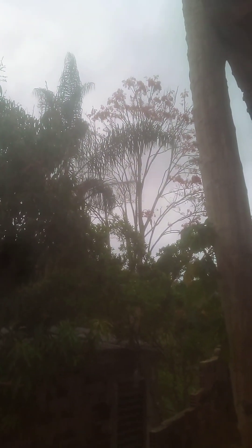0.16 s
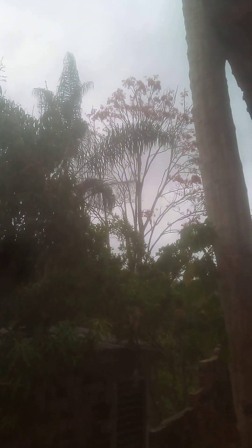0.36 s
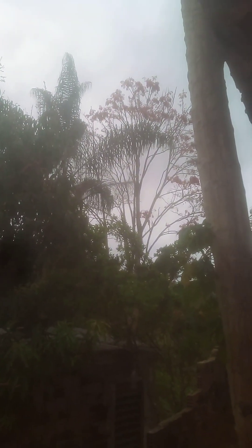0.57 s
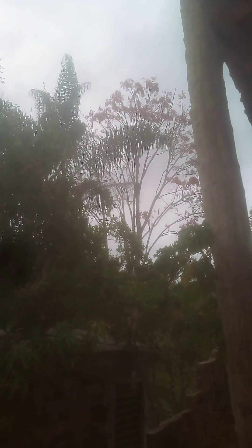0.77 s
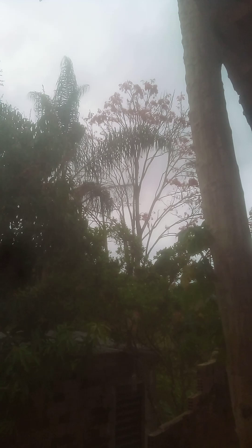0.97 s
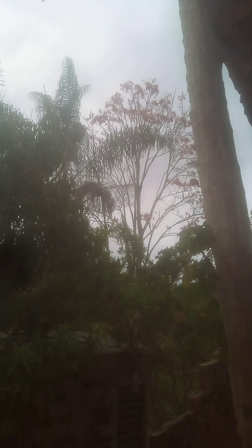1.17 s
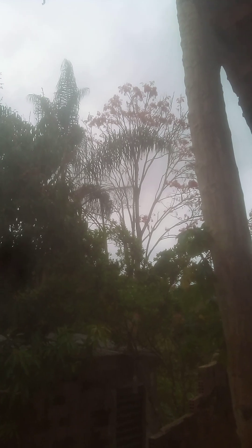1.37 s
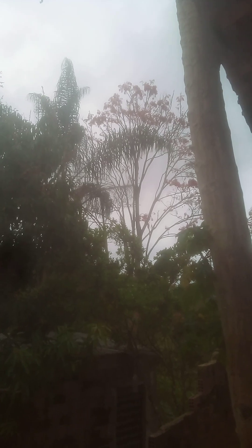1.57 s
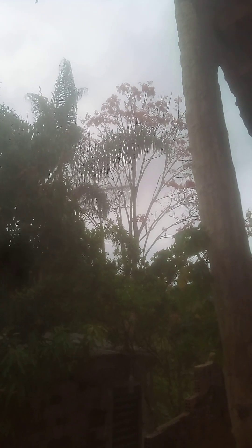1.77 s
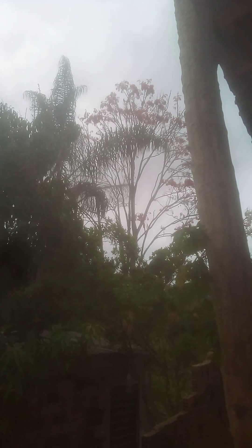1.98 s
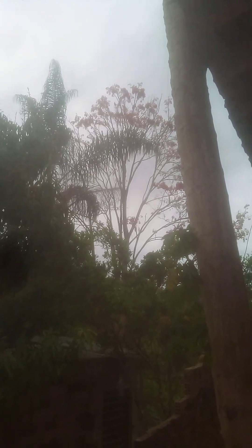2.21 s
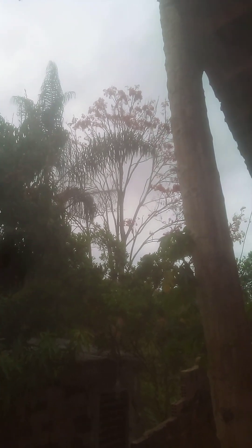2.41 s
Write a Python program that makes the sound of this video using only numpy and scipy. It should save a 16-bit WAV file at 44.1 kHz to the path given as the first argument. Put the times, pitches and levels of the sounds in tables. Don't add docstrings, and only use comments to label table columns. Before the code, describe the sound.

Outdoors in a leafy garden, one close bright parrot squawk comes early, then a cluster of distant raspy squawks, small twig ticks and late low fowl hoots, above a quiet hissing insect background.

```python
import sys
import numpy as np
from scipy import signal
from scipy.fft import rfft, irfft
from scipy.io import wavfile
from scipy.ndimage import uniform_filter1d

SR = 44100
rng = np.random.default_rng(int(sys.argv[2]) if len(sys.argv) > 2 else 0)


def put_to_file(sound):
    columns = np.atleast_2d(sound).T
    safe = np.clip(columns, -1, 1)
    whole_steps = np.round(safe * 32767)
    wavfile.write(sys.argv[1], SR, whole_steps.astype(np.int16))


def makeup_ratio(level_db):
    decades = np.asarray(level_db, float) / 20
    return 10 ** decades


N = 108045
T = np.arange(N) / SR
TOP_HZ = 15750

# f/Hz, density/dB per Hz
AIR_SPECTRUM = [(30, -19), (55, -2), (200, -8), (800, -9), (1400, -16.5), (2600, -9), (6000, -28.5),
                (15500, -27)]
# t/s, length/s, low f/Hz, high f/Hz, level/dB
TRAFFIC_SWELLS = [
    (0.158, 0.32, 88, 1110, -68.5),
    (1.092, 0.84, 296, 562, -68.5),
    (1.268, 0.36, 680, 1670, -68.5),
    (1.846, 0.34, 320, 664, -68),
    (2.237, 0.077, 320, 417, -66.5),
]
# f/Hz, density/dB
CICADA_SPECTRUM = [(2240, -48), (3800, -11), (4170, -9.5), (4400, -1), (4750, -1), (5150, -10), (5500, -20),
                   (6000, -25)]
# first t/s, last t/s, f/Hz, pulse rate/Hz, level/dB
CRICKET_TRAINS = [
    (0.611, 1.3, 8720, 32, -70.5),
    (2.03, 2.45, 8800, 30, -72),
    (1.343, 1.42, 9900, 23, -77),
    (1.498, 1.58, 9950, 13, -72),
    (1.676, 1.75, 9950, 23, -75),
    (1.857, 1.93, 9950, 23, -81.5),
    (2.025, 2.1, 9800, 23, -73),
    (2.195, 2.27, 9950, 23, -72),
    (2.37, 2.44, 10100, 23, -79),
]
# t/s, peak level/dB, lower ring level/dB, lower ring f/Hz
TWIG_SNAPS = [(0.521, -48, -13, 7030), (0.548, -37.5, -16, 7160), (0.602, -45, 0.5, 7560),
              (0.998, -52.5, -6.5, 7600), (1.1154, -41, -16, 7370), (1.254, -61, 4, 7600),
              (1.5028, -56, -13, 7500), (1.9462, -48, -11, 7270), (2.0353, -60, 3, 7260),
              (2.0375, -60, 15, 3620), (1.2545, -64, 11, 3930)]
# t/s, length/s, start f/Hz, end f/Hz, level/dB
WHISTLES = [
    (.115, 0.19, 7920, 7980, -73.5),
    (.93, 0.13, 7580, 7590, -70.5),
    (1.614, 0.071, 9750, 6500, -71),
    (2.238, .016, 6100, 7900, -80),
    (2.345, 0.016, 6200, 7500, -79.5),
    (2.436, .014, 7400, 7100, -79),
]
# t/s, length/s, start f/Hz, end f/Hz, level/dB
HOOTS = [(.9, 0.13, 869, 830, -71.5), (1.04, 0.12, 841, 837, -76), (1.14, 0.465, 430, 432.2, -66.5),
         (1.61, 0.28, 418, 412.4, -65), (1.33, 0.078, 885, 890, -64.5), (1.34, 0.096, 1744, 1790, -69),
         (1.985, 0.101, 899, 851, -57), (2.068, 0.038, 820, 814, -58.5), (2.336, 0.022, 830, 1090, -59.5),
         (2.352, 0.021, 1080, 980, -61.5), (2.366, 0.03, 970, 803, -55.5)]
# t/s, length/s, top f/Hz, level/dB, beak resonance level/dB
FAR_SQUAWKS = [(-.1, 0.17, 758, -59.5, 6), (0.574, 0.095, 769, -52, 5.5), (0.63, 0.14, 498, -57.5, 3.5),
               (0.695, 0.083, 796, -57.5, 6), (0.757, 0.087, 743, -51, 11.5), (1.002, 0.077, 766, -51.5, 6),
               (1.032, .08, 773, -52.5, 5.5), (1.032, 0.2, 494.7, -58, 5), (1.121, 0.1, 775, -55.5, 6.5),
               (1.22, 0.13, 695, -60.5, 2.5), (1.301, 0.14, 575, -62, 12.5), (1.5, .13, 521.6, -71.5, 16),
               (2.171, 0.129, 625, -71, 14), (0.836, 0.11, 707, -61, 6.5), (1.37, 0.126, 661, -64, 7)]
# f/Hz, level/dB
FAR_THROAT = [(700, -28), (1400, -21.5), (2000, -5.5), (3500, -3), (5500, -15.5), (7200, -14),
              (8000, -44.5), (9500, -48.5)]
# t/s, fundamental f/Hz, level/dB, odd overtone level/dB, fourth overtone ring level/dB
SQUAWK_CONTOUR = [
    (0.168, 466, -69.5, -6, -1),
    (0.177, 499, -45, -21, 5.5),
    (0.192, 568.3, -38, -24, 11),
    (0.203, 634, -37, 1, 6),
    (0.226, 721, -27, 2, 20),
    (0.305, 707.5, -23.5, -2.5, 21),
    (0.341, 681.7, -28.5, 5, 16.5),
    (0.356, 646.4, -35, 18, 24),
    (0.374, 464, -35.5, -20.5, 6.5),
]
# f/Hz, level/dB
NEAR_THROAT = [(700, -37), (1400, -22.5), (2200, -17), (3900, -19.5), (5000, -19.5), (6500, -21.5),
               (7900, -32.5), (10000, -57.5)]

DULL_DB_PER_DB = 0.26
MOUTH_PER_DULL, SECOND_PER_DULL, RAGGED_PER_DULL = 2.15, 0.61, 0.22
MOUTH_HZ, MOUTH_WIDTH_HZ, MOUTH_DB = 3150, 670, -2
TOP_RING_HZ, TOP_RING_WIDTH_HZ, TOP_RING_DB = 12600, 2900, 8


def level(x, db):
    return x * makeup_ratio(db) / np.sqrt(np.mean(x ** 2))


def shape(table, hz):
    table = np.array(table, float)
    return np.interp(np.log(np.maximum(hz, 1)), np.log(table[:, 0]), table[:, 1])


def walk(rate, count=N):
    k = max(int(SR / rate), 1)
    held = np.repeat(rng.standard_normal(count // k + 1), k)
    return 1.382 * uniform_filter1d(uniform_filter1d(held, k), k)[:count]


def noise(table, lo_hz, hi_hz):
    hz = np.arange(N // 2 + 1) * SR / N
    octave_edge = np.minimum(np.log(hz / lo_hz + 1e-9), np.log(hi_hz / (hz + 1e-9)))
    band = np.sin(np.clip(octave_edge * 8 + .5, 0, 1) * np.pi / 2)
    return irfft(rfft(rng.standard_normal(N)) * makeup_ratio(shape(table, hz)) * band, N)


def leaves(x, t60, rustle=0.53):
    t = T[:SR]
    tail = rng.standard_normal(SR) * np.exp(-np.log(1000) * t / t60) * np.minimum(t / 0.028, 1)
    moving = (1 + rustle * walk(90)) / np.sqrt(1 + rustle ** 2)
    return moving * signal.fftconvolve(x, tail / np.sqrt(np.sum(tail ** 2)))[:N]


def gate(start, length, edge):
    return np.sin(np.pi / 2 * np.clip(np.minimum(T - start, start + length - T) / edge, 0, 1)) ** 2


def air():
    edges = (22, 90, 250, 600, 1200, 2000, 3800, 7000, 17000)
    bands = [makeup_ratio(min(1.5, 3000 / lo) * .7 * walk(6)) * noise(AIR_SPECTRUM, lo, hi)
             for lo, hi in zip(edges, edges[1:])]
    return level(sum(bands), -63)


def traffic():
    out = np.zeros(N)
    for s, length, lo, hi, db in TRAFFIC_SWELLS:
        rush = level(noise(AIR_SPECTRUM, lo, hi), db)
        out += rush * makeup_ratio(1.6 * walk(25.58)) * gate(s, length, length / 3)
    return out


def cicadas():
    edges = (3800, 4400, 4800, 5200, 6000)
    chorus = [makeup_ratio(.5 * walk(3) + 1.3 * walk(60)) * noise(CICADA_SPECTRUM, lo, hi)
              for lo, hi in zip(edges, edges[1:])]
    return level(sum(chorus), -59.5)


def crickets():
    out = np.zeros(N)
    for s, end, hz, rate, db in CRICKET_TRAINS:
        stroke = np.clip(0.34 * np.sin(2 * np.pi * rate * (T - s)) + 0.086, 0, 1)
        pulse = stroke * (T > s) * (T < end)
        out += makeup_ratio(db + 1.4 * walk(14.4)) * pulse * np.sin(2 * np.pi * hz * T)
    return out


def twigs():
    out = np.zeros(N)
    for s, db, low_db, hz in TWIG_SNAPS:
        t = np.maximum(T - s - .001, 0)
        high = np.sin(2 * np.pi * 12000 * t) * np.exp(-t / 0.0003)
        low = makeup_ratio(low_db) * np.sin(2 * np.pi * hz * t) * np.exp(-t / 0.00082)
        burst = 0.22 * (t > 0) * rng.standard_normal(N) * np.exp(-np.log(1000) * t / 0.0028)
        out += makeup_ratio(db) * (high + low + burst)
    return out


def glides(table, wet_db, t60, bend, rasp, waver_db):
    dry = np.zeros(N)
    for s, length, hz0, hz1, db in table:
        slide = hz0 + (hz1 - hz0) * np.clip((T - s) / length, 0, 1) ** bend
        hz = slide * (1 + .002 * walk(45) + rasp * walk(500))
        loudness = makeup_ratio(db + 3.5 + waver_db * walk(59.66)) * gate(s, length, min(.012, length / 3))
        dry += loudness * np.sin(2 * np.pi * np.cumsum(hz) / SR)
    return dry + makeup_ratio(wet_db) * leaves(dry, t60, rustle=50 * rasp)


def small_birds():
    return glides(WHISTLES, 0, .3, bend=.75, rasp=.02, waver_db=3.)


def far_fowl():
    return glides(HOOTS, -13, .3, bend=1.2, rasp=.004, waver_db=1.)


def voice(hz, throat, beak_hz, beak_db, odd_db, wobble, flutter_db, rasp, dull_db=0, ring_db=0,
          width_hz=144, late_db=0):
    n, k = len(hz), np.arange(1, 23)[:, None]
    ragged = 1 + RAGGED_PER_DULL * dull_db
    drift = 1 + wobble * ragged * (walk(109.3, count=n) + 0.589 * walk(400, count=n))
    hz = hz * drift
    f = k * hz

    slope_db = (dull_db + late_db) * np.log2(np.maximum(f / 3500, 1))
    top_db = TOP_RING_DB / (1 + (2 * (f - TOP_RING_HZ) / TOP_RING_WIDTH_HZ) ** 4)
    plain = makeup_ratio(shape(throat, f) - slope_db + top_db) * (f < TOP_HZ)

    mouth_db = (ring_db + MOUTH_PER_DULL * dull_db) / (1 + (2 * (f - MOUTH_HZ) / MOUTH_WIDTH_HZ) ** 4)
    peak_db = beak_db / (1 + (2 * (f - beak_hz * drift) / width_hz) ** 2)
    second_db = SECOND_PER_DULL * dull_db * (k == 2)
    gain = plain * makeup_ratio(odd_db * (k % 2) + mouth_db + second_db + peak_db)

    calm = 1 - 0.96 * gain / gain.max(axis=0)
    overtone_rasp = rasp * (1 + (k[:, 0] / 13) ** 4)
    life = np.array([g * makeup_ratio(flutter_db * c * walk(160, count=n)) + p * r * ragged * walk(1100, count=n)
                     for g, p, c, r in zip(gain, plain, calm, overtone_rasp)])
    phase = 2 * np.pi * (k * np.cumsum(hz) / SR + rng.random((len(k), 1)))
    power = np.sum(gain ** 2 + (rasp * ragged * plain) ** 2, axis=0) / 2
    return np.sum(life * np.sin(phase), axis=0) / np.sqrt(power)


def far_parrots():
    dry = np.zeros(N)
    for s, length, hz, db, beak_db in FAR_SQUAWKS:
        on = (T > s) & (T < s + length)
        arch = 1 - .13 * np.abs(2 * (T[on] - s) / length - 1) ** 6
        call = voice(hz * arch, FAR_THROAT, 4 * hz, beak_db, odd_db=-8, wobble=.028, flutter_db=6,
                     rasp=1.05, width_hz=380)
        dry[on] += makeup_ratio(db + 2.4 * walk(70, count=on.sum())) * gate(s, length, .035)[on] * call
    return dry + leaves(dry, .38, rustle=.5)


def near_parrot():
    s, hz, db, odd_db, beak_db = np.array(SQUAWK_CONTOUR).T
    on = (T > s[0]) & (T < s[-1])
    t = T[on]
    odd_db = np.interp(t, s, odd_db) - 10 * np.clip((.198 - t) / 0.0033, 0, 1)
    beak_db = np.interp(t, s, beak_db)
    tremor = 1 + .011 * np.sin(2 * np.pi * 56.5 * (t - .2545))
    hz = np.interp(t, s, hz) * tremor

    # t/s, level/dB
    catches = ((.1815, -16), (.1965, -16), (.2105, -7))
    breaks = sum(d * np.exp(-((T - c) / .0018) ** 2) for c, d in catches)
    effort = makeup_ratio(np.interp(T, s, db) + breaks) * gate(s[0], s[-1] - s[0], 0.0039)
    dull_db = DULL_DB_PER_DB * np.minimum(db.max() - np.interp(t, s, db), 16)
    late_db = 5 * np.clip((t - .35) / .01, 0, 1)

    front, side = np.zeros((2, N))
    front[on] = voice(hz, NEAR_THROAT, 4 * hz, beak_db, odd_db, wobble=.004, flutter_db=3.4, rasp=.27,
                      dull_db=dull_db, ring_db=MOUTH_DB, late_db=late_db)
    side[on] = voice(hz, NEAR_THROAT, 4 * hz, beak_db - 12, odd_db, wobble=.018, flutter_db=4, rasp=.8,
                     dull_db=dull_db, ring_db=MOUTH_DB)
    near_trees = makeup_ratio(-17.5) * leaves(side * effort, 0.31)
    far_trees = makeup_ratio(-22.5) * leaves(side * effort, 1)
    return front * effort + near_trees + far_trees


def scene():
    background = air() + traffic() + cicadas() + crickets() + twigs()
    birds = small_birds() + far_fowl() + far_parrots() + near_parrot()
    return (background + birds)[None]


def top_cut(x):
    return signal.sosfilt(signal.butter(12, 15750, fs=SR, output="sos"), x)


def record(dry):
    low_pass = signal.ellip(10, .2, 70, TOP_HZ, fs=SR, output="sos")
    mix = signal.sosfilt(low_pass, dry)
    return top_cut(mix)


dry = scene()
out = record(dry)
put_to_file(out)
```